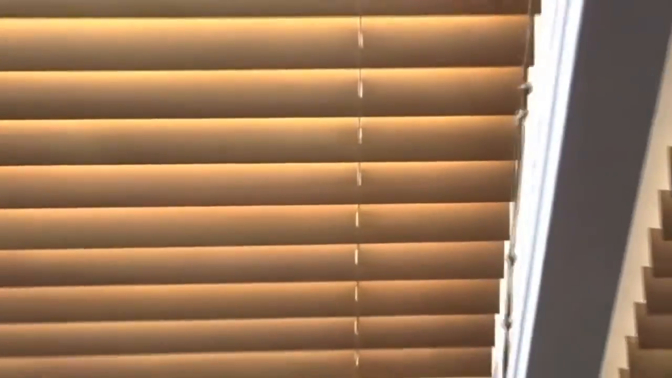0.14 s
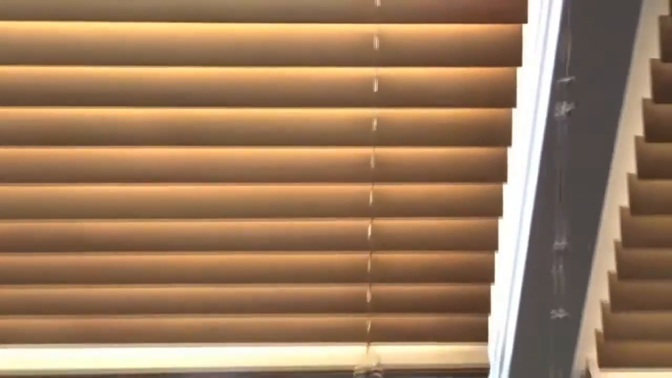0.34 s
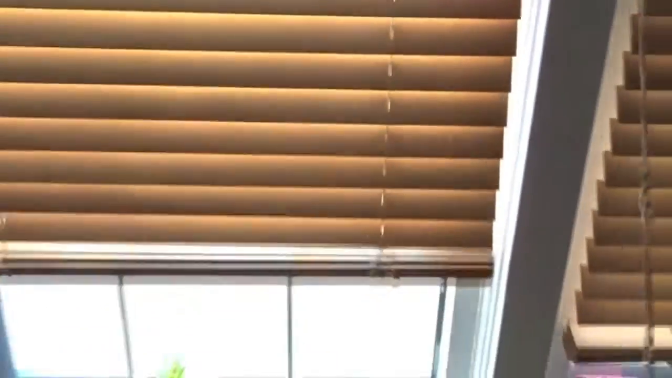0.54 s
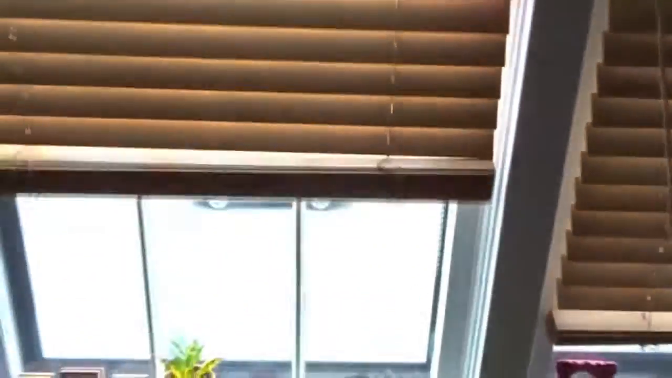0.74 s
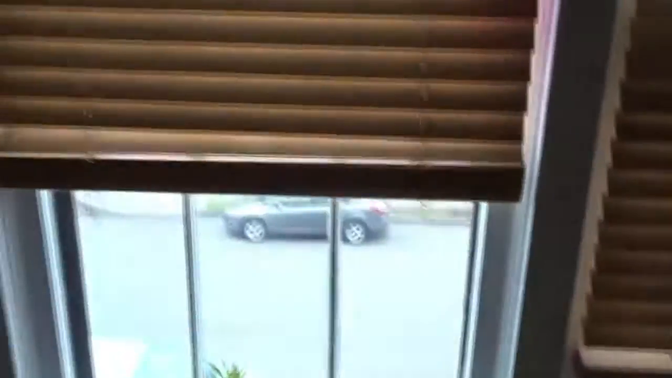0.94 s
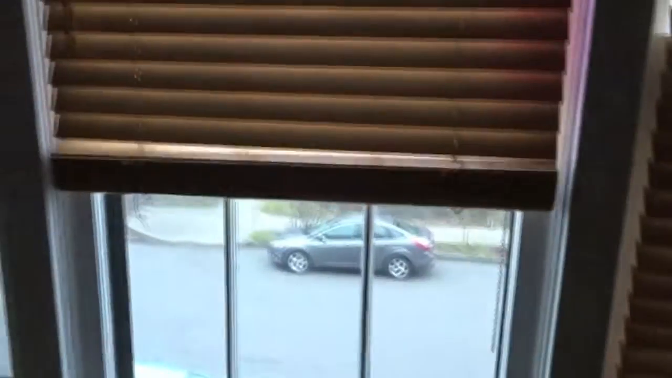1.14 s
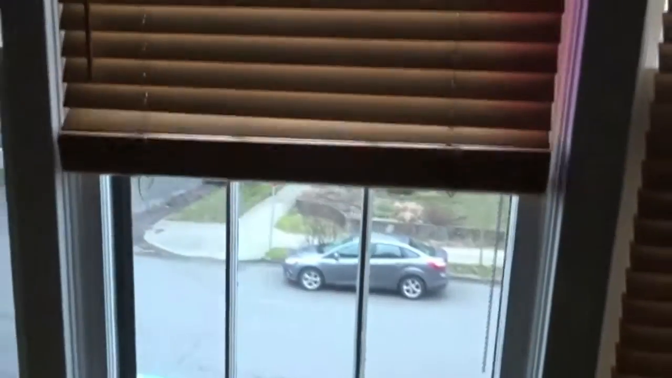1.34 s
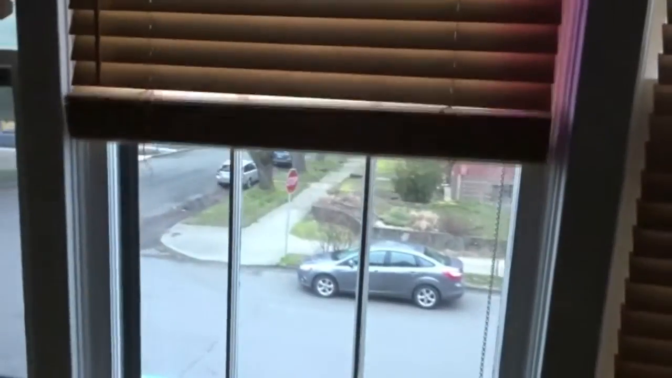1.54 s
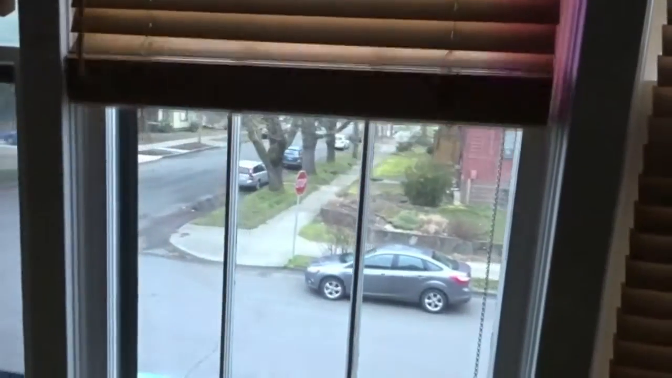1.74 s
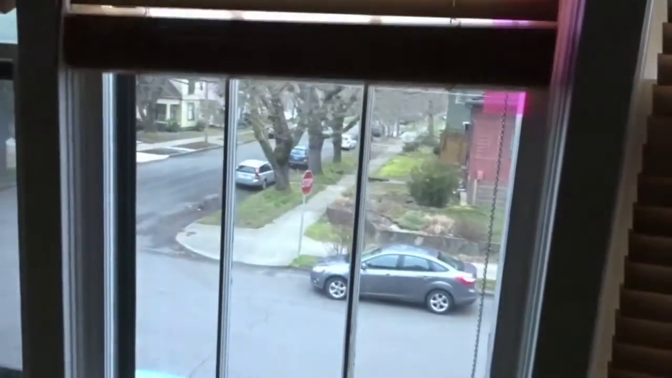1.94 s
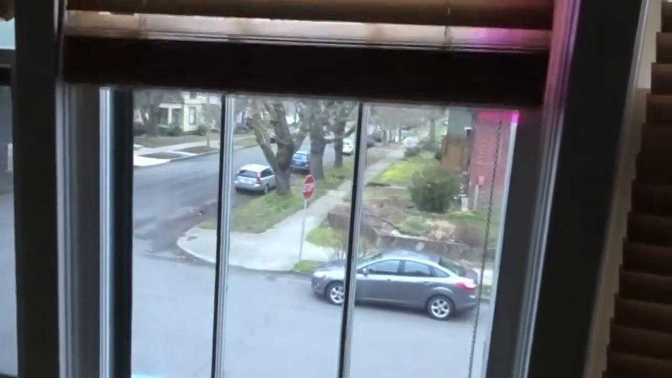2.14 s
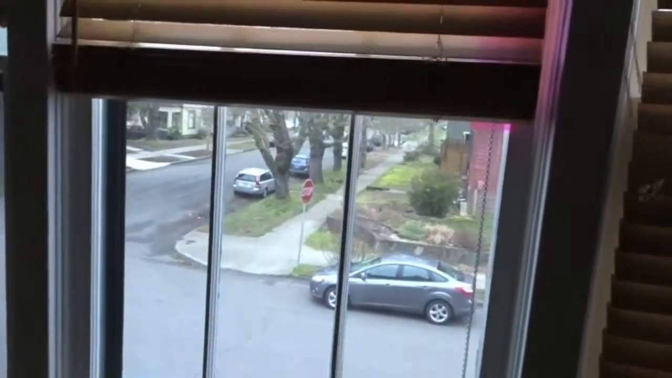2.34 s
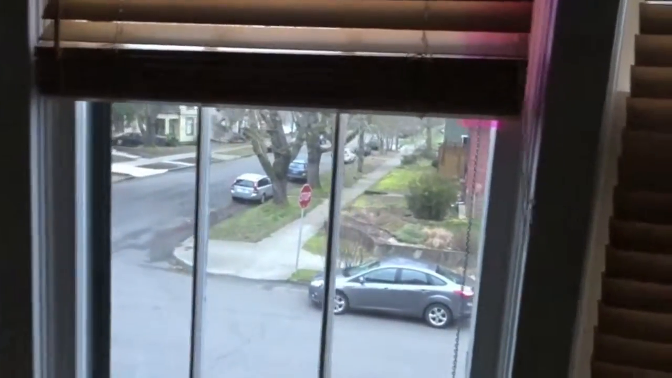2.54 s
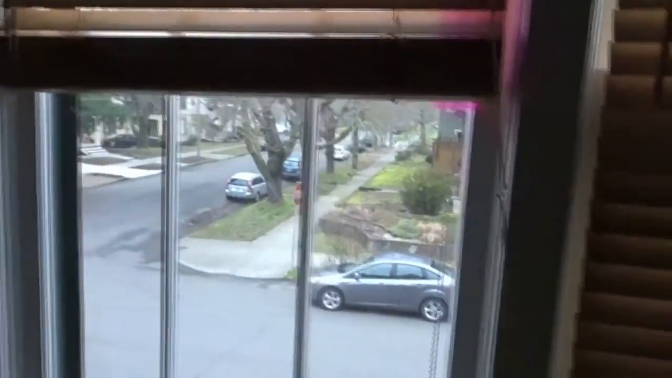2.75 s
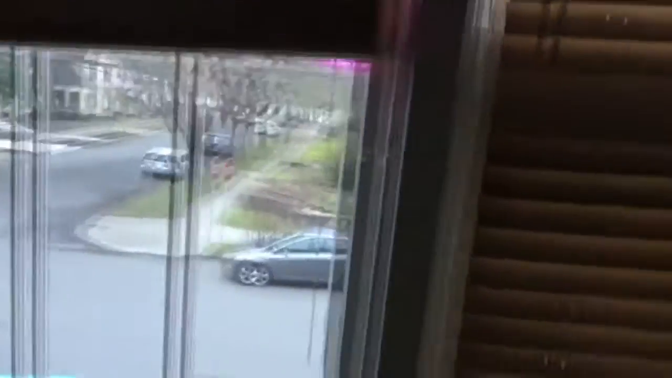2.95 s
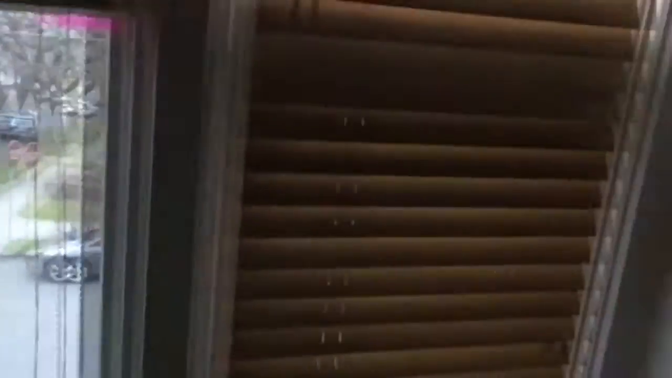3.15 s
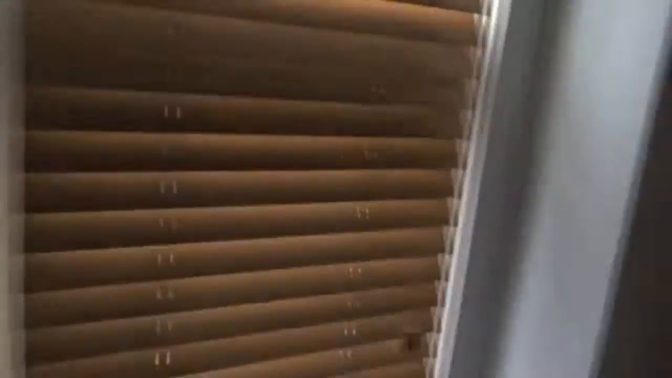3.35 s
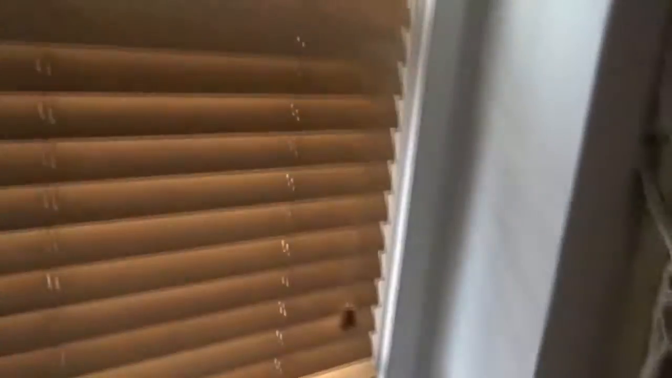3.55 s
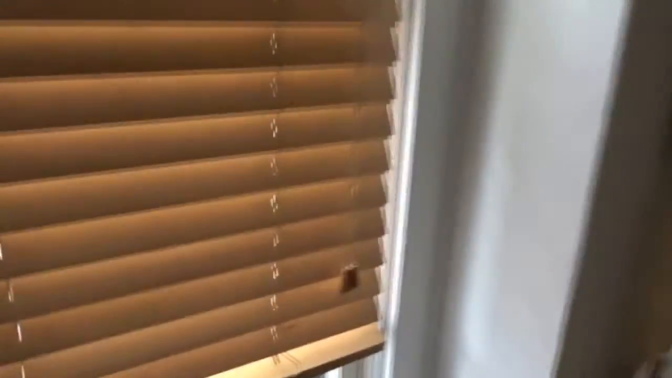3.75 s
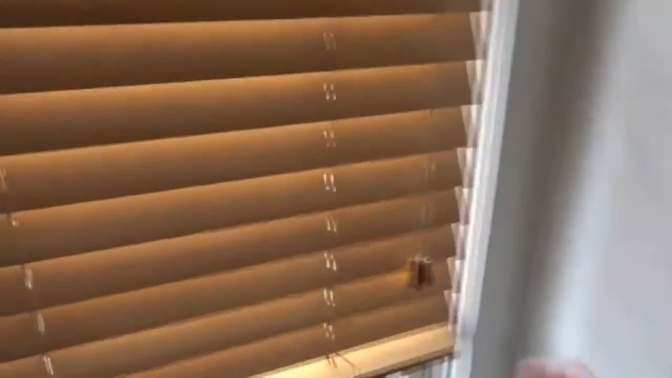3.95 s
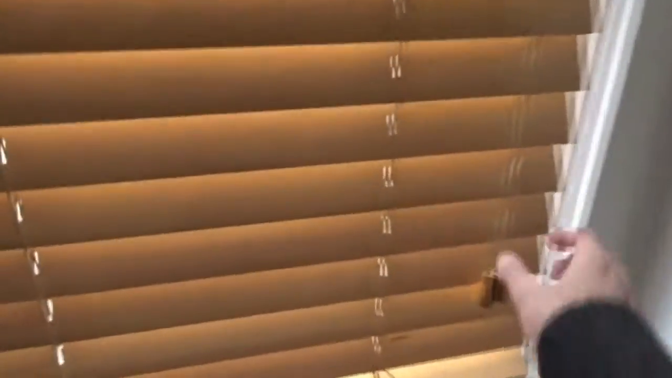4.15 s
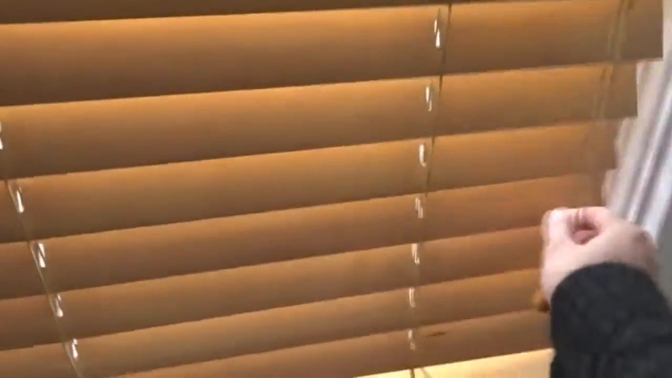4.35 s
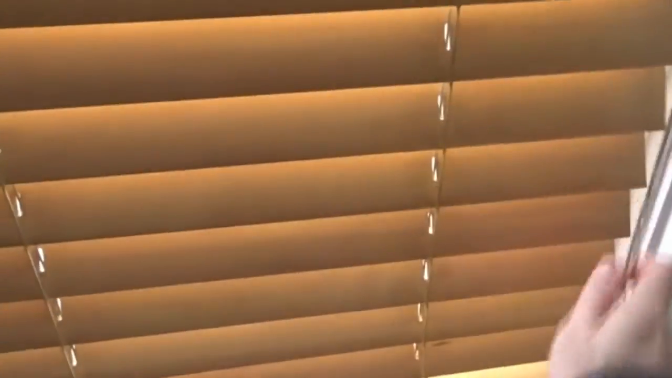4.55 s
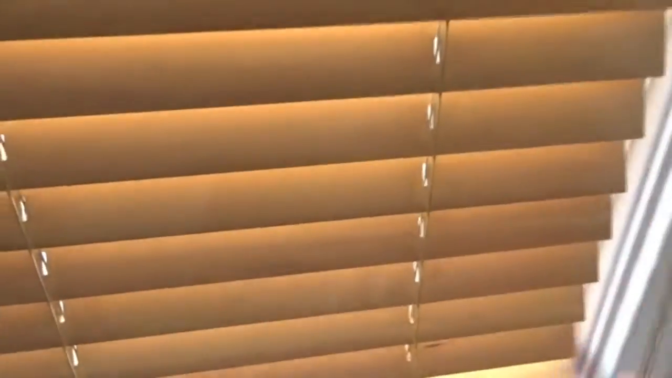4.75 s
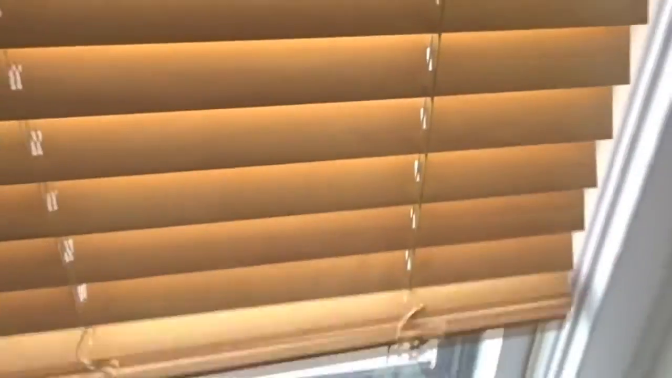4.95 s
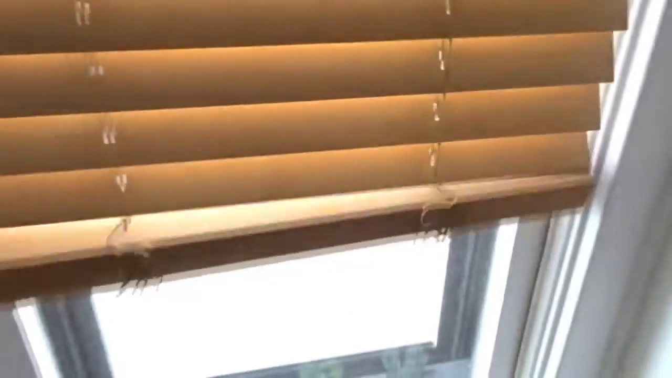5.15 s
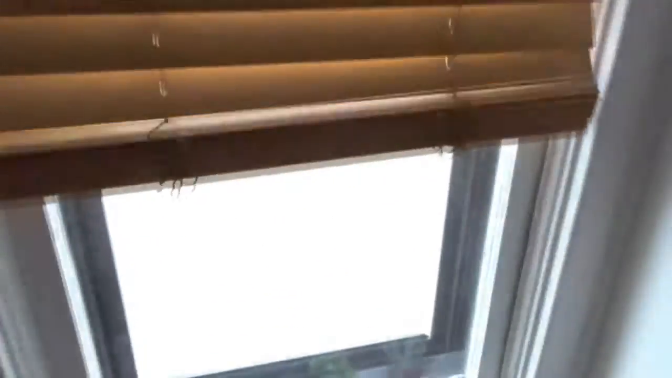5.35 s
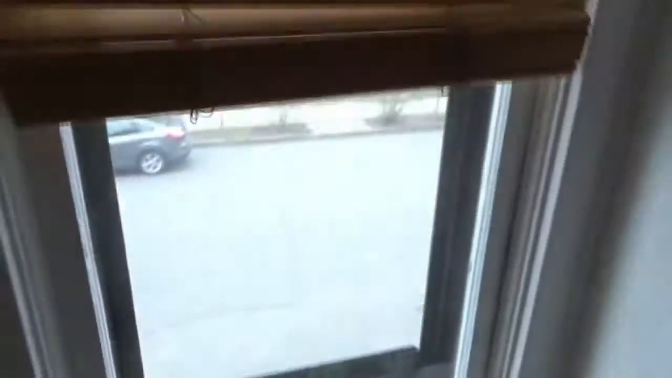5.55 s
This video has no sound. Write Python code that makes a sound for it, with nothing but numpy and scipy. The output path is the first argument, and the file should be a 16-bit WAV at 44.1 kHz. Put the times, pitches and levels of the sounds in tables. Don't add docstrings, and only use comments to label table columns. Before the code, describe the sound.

Wooden slat blinds are yanked up indoors in clattering bursts, with cord lock clicks, a brighter clack and a hollow knock between pulls.

```python
import sys
import numpy as np
from scipy import signal
from scipy.fft import rfft, irfft, next_fast_len
from scipy.io import wavfile
from scipy.ndimage import uniform_filter1d

SR = 44100
rng = np.random.default_rng(int(sys.argv[2]) if len(sys.argv) > 2 else 0)


def wrap_up_sound(samples):
    columns = np.atleast_2d(samples).T
    tamed = np.clip(columns, -1, 1)
    steps = np.round(tamed * 32767).astype(np.int16)
    wavfile.write(sys.argv[1], SR, steps)


def linear_from_db(decibels):
    return 10 ** (np.asarray(decibels, float) / 20)


N = 246959


def unit(x):
    return x / np.sqrt(np.mean(x ** 2) + 1e-20)


def along(points, hz):
    f, v = np.transpose(points)
    return np.interp(np.log(hz + 1), np.log(f + 1), v)


def filtered(x, response):
    m = next_fast_len(N + SR // 2)
    return irfft(rfft(x, m) * response(np.fft.rfftfreq(m, 1 / SR)), m)[..., :N]


def coloured(x, spectrum):
    cep = irfft(np.log(linear_from_db(along(spectrum, np.fft.rfftfreq(2048, 1 / SR))) + 1e-6))
    cep[1:1024] *= 2
    cep[1025:] = 0
    response = irfft(np.exp(rfft(cep)))
    return signal.fftconvolve(x, response[None] / np.linalg.norm(response), axes=1)[:, :N]


def resonances(modes):
    def response(f):
        total = 0
        for k, (centre, width, db) in enumerate(modes):
            drag = 1j * f * width
            total = total + (-1) ** k * linear_from_db(db) * drag / (centre * centre - f * f + drag)
        return total
    return response


def ring(x, hz, width_hz):
    r = np.exp(-np.pi * width_hz / SR)
    y = signal.lfilter([1, 0, -1], [1, -2 * r * np.cos(2 * np.pi * hz / SR), r * r], x)
    return y / np.abs(y).max()


def contacts(ms):
    t, span = np.arange(SR // 16) / SR, ms / 1000
    shape = (1 - np.exp(-t / (0.045 * span))) * np.exp(-(t / span) ** 1.6)
    bumps = np.repeat(rng.standard_normal(len(t) // 48 + 1), 48)[:len(t)]
    run = shape * linear_from_db(2.0 * bumps) * rng.standard_normal((2, len(t)))
    return run / np.sqrt(np.sum(run[0] ** 2) / (span * SR))


def chatter(rate, scatter_db):
    hit = rng.random(N) < rate / SR
    size = linear_from_db(scatter_db * np.minimum(rng.exponential(size=N), 4))
    return hit * size * rng.standard_normal((2, N))


def swells(rows):
    t, total = np.arange(N) / SR, 0
    for s, db, rise, fall in rows:
        away = np.where(t < s, (s - t) / abs(rise), (t - s) / abs(fall))
        total = total + linear_from_db(db - 20 * away)
    return total


# (time [s], level [dB])
PULLS = [
    [(.2, -67.5), (.43, -60), (.51, -51.5), (.65, -24), (.74, -32), (.8, -24.5), (.92, -32.5), (.98, -42),
     (1.02, -60)],
    [(.96, -60), (1.0, -43), (1.18, -37), (1.61, -36.5), (1.84, -30.5), (1.98, -44), (2.1, -54.5),
     (2.25, -51), (2.4, -69.5)],
    [(4.76, -71), (4.886, -41), (4.94, -41), (5.018, -30), (5.048, -28.5), (5.118, -33), (5.41, -31),
     (5.6, -36)],
]


def cord_speed():
    t = np.arange(N) / SR
    speeds = []
    for pull in PULLS:
        s, db = np.transpose(pull)
        speeds.append(np.interp(t, s, db, left=-120, right=-120))
    return np.max(speeds, axis=0) + 35


# (frequency [Hz], level [dB per Hz])
HUM = [(53, -53), (90, -17), (135, -10), (260, -6), (350, -2.5), (525, -12.5), (800, -18), (1980, -120)]
# (frequency [Hz], level [dB per Hz])
AIR = [(290, -29.5), (500, -9), (1020, -17), (1150, -15), (1980, -22.5), (14700, -38), (16500, -52.5)]
# (time [s], peak level [dB], time to rise 20 dB [s], time to fall 20 dB [s])
JOLTS = [
    (0, -67, .1, 0.5),
    (.55, -51, -0.1, .5),
    (1.8, -57, 0, .4),
    (3.17, -60.5, -0.1, 1),
    (4.55, -61, 0.3, 0.3),
    (5.26, -53, -0.1, 0.3),
    (5.6, -57, 0.1, -1),
]


def background():
    def noise(spectrum):
        return unit(filtered(rng.standard_normal((2, N)), lambda hz: linear_from_db(along(spectrum, hz))))
    rumble = noise([(15, -28), (30, -1.5), (60, -6.5), (90, -18), (200, -59)])
    house_db, frame_db, frame_grows = -54.5, -48.5, .5
    boom = np.hypot(linear_from_db(house_db), linear_from_db(frame_db + frame_grows * cord_speed()))
    still_hand_db = -71
    hand = linear_from_db(still_hand_db) + swells(JOLTS)
    return hand * rumble + boom * noise(HUM) + linear_from_db(-59.5) * noise(AIR)


# (frequency [Hz], level [dB per Hz])
CLOTH = [(500, -23), (1200, 3.5), (2500, -2), (4500, -2.5), (7500, -5), (11000, -13), (16000, -19.5)]
# (time [s], peak level [dB], time to rise 20 dB [s], to fall 20 dB [s])
SLEEVE = [
    (.25, -66.5, 3, .4),
    (.465, -36.5, 0.08, 0.8),
    (2.2, -42.5, .05, .09),
    (2.64, -68.5, 0.4, 0.3),
    (3.55, -64.5, .9, .3),
    (3.89, -63.5, 0.17, .11),
    (4.31, -49.5, 0.01, -0.05),
    (4.375, -45.5, 0.03, 0.15),
    (4.53, -46.5, 0.13, .2),
    (4.66, -60, 0, .1),
]


def sleeve():
    rustle = unit(coloured(chatter(13000, scatter_db=3), CLOTH))
    return swells(SLEEVE) * rustle


# (frequency [Hz], width [Hz], level [dB])
STACK = [(599, 81, 0), (810, 180, -1), (1000, 280, -6.5)]
# (frequency [Hz], width [Hz], level [dB])
SLATS = [(1600, 370, -6.5), (2500, 250, 0), (2950, 160, -3), (3550, 290, -3.5), (5170, 400, -6),
         (5950, 140, -6), (6860, 410, -11)]
# (frequency [Hz], level [dB per Hz])
HISS = [(3000, -17.5), (6000, 2), (10000, 4.5), (16000, -28.5)]
# (level at a steady pull [dB], growth with speed [dB per dB])
FOLLOWS = [
    (-36.5, .58),
    (-34, 0.99),
    (-42.5, 1.2),
]


def rattle():
    stack = resonances(STACK)

    def stack_body(f):
        thin_bass = f ** 2 / (f ** 2 + 550 ** 2) * f ** 2 / (f ** 2 + 450 ** 2)
        return stack(f) * thin_bass

    layers = [filtered(chatter(1500, scatter_db=2.0), stack_body),
              filtered(chatter(2500, scatter_db=3.0), resonances(SLATS)),
              coloured(chatter(4000, scatter_db=2.5), HISS)]
    speed, total = cord_speed(), 0
    for (db, grows), layer in zip(FOLLOWS, layers):
        total = total + linear_from_db(db + grows * speed) * unit(layer)
    return total


# (pull start [s], note [Hz], fall [Hz per s], negative = rising)
STACK_NOTE = [
    (.4, 850, 170),
    (1, 770, -90),
    (4.8, 930, 290),
]


def stack_note(s):
    begun = [row for row in STACK_NOTE if row[0] <= s] or STACK_NOTE[:1]
    start, hz, fall = begun[-1]
    scatter = .055
    return (hz - fall * (s - start)) * (1 + scatter * rng.standard_normal())


# (frequency [Hz], level [dB per Hz])
CRACK = [(590, -25), (1000, -0.5), (1700, -3), (3050, -5), (4130, -5), (11500, -9.5), (15600, -13.5),
         (16500, -52.5)]


def wooden(x):
    slats = resonances(SLATS)
    return filtered(coloured(x, CRACK), lambda f: 1 + .6 * slats(f))


# (time [s], peak level [dB], stack note re peak [dB], slat note [Hz])
FIRST_PULL = [(.3416, -38.5, -6, 2280), (.4688, -16, -9.5, 3100), (.5018, -8.5, -11.5, 2940),
              (.5394, -16, -5.5, 5040), (.5806, -8, -13, 2500), (.6304, -10.5, -7.5, 3230),
              (.6444, -7.5, -11, 3240), (.6794, -6.5, -16.5, 3000), (.6954, -11.5, -4, 2830),
              (.7104, -12, -4, 2880), (.7392, -5.5, -15.5, 5970), (.7602, -7, -13.5, 2960),
              (.7786, -6, -20, 2400), (.7994, -12, -17, 2480), (.8204, -9.5, -5, 2600),
              (.8634, -7, -7.5, 3030), (.8994, -18.5, -8.5, 3030), (.9916, -12, -7, 3900),
              (1.0074, -21, -27, 3120)]
SECOND_PULL = [(1.0959, -24, -26, 3250), (1.1483, -13, -11.5, 2950), (1.2042, -19, -10.5, 2760),
               (1.2545, -19, -4.5, 3210), (1.2773, -18, -14.5, 2920), (1.3418, -16, -21.5, 5000),
               (1.3834, -17, -7.5, 3750), (1.4048, -14, -15, 2860), (1.4682, -14.5, -13, 2560),
               (1.4804, -23.5, -4.5, 2850), (1.511, -15.5, -4, 2800), (1.5644, -30, -1.5, 2380),
               (1.5907, -18.5, -20.5, 2840), (1.6325, -17.5, -20.5, 2874), (1.6546, -14, -16, 5000),
               (1.6664, -13, -10, 2940), (1.7093, -14.5, -13.5, 2910), (1.732, -14.5, -4.5, 2640),
               (1.7644, -7.5, -10, 3460), (1.8694, -16.5, -11, 3370), (1.9056, -16.5, -12.5, 2860),
               (1.9295, -18, -9.5, 5040), (2.1044, -33.5, -1.5, 3030), (2.1844, -33.5, -5.5, 3990)]
THIRD_PULL = [(4.8115, -45, 0, 5050), (4.8315, -36, -2, 3190), (4.8658, -20.5, -21, 4090),
              (4.8858, -17, -12, 6150), (4.9207, -17, -10, 2930), (4.97, -18, -10, 2910),
              (4.9991, -9.5, -24, 2950), (5.0387, -13, -21, 4340), (5.1089, -13, -15.5, 3410),
              (5.1472, -7.5, -24, 3430), (5.186, -11, -19, 3380), (5.231, -13.5, -6.5, 3550),
              (5.2874, -13.5, -11, 2480), (5.3156, -9, -12.5, 3200), (5.4146, -7, -13.5, 2196),
              (5.45, -9.5, -15.5, 3203), (5.4891, -7, -10, 3480), (5.5213, -9, -17, 5300),
              (5.5661, -8, -13, 3550)]
# (time [s], peak level [dB], stack note re peak [dB], slat note [Hz])
BLOWS = [(.5018, -10, -1.5, 2870), (1.1483, -19, -6, 2950), (1.7644, -5.5, -26, 3540),
         (4.9207, -22, -2, 2960), (5.0444, -10, -20, 4580), (5.1088, -9.5, -4, 3410),
         (5.3158, -12, -8, 3350), (5.3344, -17, -7.5, 2970), (5.4141, -14, .5, 2200),
         (5.4374, -7.5, -12, 3100), (5.5814, -6, -22, 5350)]


def claps(rows, hard_ms, softer):
    cracks, notes, pushes = np.zeros((3, 2, N + SR))
    for s, db, rel_db, high_hz in rows:
        run = contacts(1.335 * (hard_ms - softer * db))
        low_hz = stack_note(s)
        start = round(s * SR)
        at = slice(start, start + run.shape[1])
        cracks[:, at] += linear_from_db(db - 12.5) * run
        pushes[:, start] += linear_from_db(db - 11) * np.linalg.norm(run[0])
        notes[:, at] += linear_from_db(db - 7) * ring(run, high_hz, high_hz / 12)
        low = ring(ring(run, low_hz, width_hz=162), low_hz, width_hz=1000)
        notes[:, at] += linear_from_db(db + rel_db + 4) * low
    return np.array([wooden(cracks[:, :N]), notes[:, :N], wooden(pushes[:, :N])])


# (time [s], peak level [dB], note [Hz])
THUDS = [(0.402, -35, 855), (0.416, -31, 930), (0.437, -27, 953), (0.866, -16, 760), (1.385, -19, 885),
         (1.515, -15, 720), (2.23, -30, 751), (2.454, -29, 2060), (3.257, -35, 970), (3.262, -39, 1600),
         (3.275, -39.5, 980), (4.264, -43, 940), (4.666, -33, 850), (4.69, -38, 830), (5.06, -25, 570),
         (1.258, -24, 670)]
# (time [s], peak level [dB], note [Hz])
THUMPS = [
    (1.64, -34, 150),
    (1.91, -42, 129.6),
    (3.49, -40, 348),
    (4.42, -43, 187),
    (4.515, -32, 165),
    (4.286, -45, 170),
    (4.99, -38, 184),
    (5.04, -40, 180),
]


def thuds(rows, ms, width_hz):
    out = np.zeros((2, N + SR))
    for s, db, hz in rows:
        run = np.pad(contacts(ms), ((0, 0), (0, SR // 4)))
        bump = ring(ring(run, hz, width_hz), hz, hz)
        out[:, round(s * SR):][:, :bump.shape[1]] += linear_from_db(db) * bump
    return out[:, :N]


# (time [s], peak level [dB], body re peak [dB], click centre [Hz], room level [dB])
TAPS = [
    (2.4349, -28.5, -8, 3870, -10),
    (2.6173, -34, -21.5, 3550, -4),
    (3.5849, -51, 10.5, 3650, 2),
    (3.896, -46.5, -8, 3310, -7),
    (4.288, -28, -8, 3000, -9),
    (4.3051, -31.5, -18, 4140, -8.5),
    (4.4194, -34, -23, 4390, -14),
    (4.5244, -30, 10, 4100, -11.5),
    (4.5537, -32.5, 6, 3870, -11),
    (4.6296, -18, -30, 4600, -8),
]


def taps():
    dry, wet = np.zeros((2, 2, N + SR))
    for s, db, low_db, hz, room_db in TAPS:
        run = contacts(ms=4)
        run[:, 0] += 5
        body = ring(run, 520, width_hz=800)
        click = linear_from_db(db) * (ring(run, hz, 0.87 * hz) + linear_from_db(low_db) * body)
        at = slice(round(s * SR), round(s * SR) + run.shape[1])
        dry[:, at] += click
        wet[:, at] += linear_from_db(room_db) * click
    return dry[:, :N], wet[:, :N]


# (time [s], peak level [dB], room level [dB])
FAR = [
    (2.436, -35, 2.5),
    (3.032, -23, 4),
]
# (frequency [Hz], level [dB per Hz])
LATCH = [
    [(88, -28), (200, -13), (535, -12), (900, 1.5), (1900, -9), (2600, -17), (4200, -20), (11500, -39),
     (15000, -51.5)],
    [(88, -37), (150, -13.5), (500, -8), (1330, -9.5), (3370, -6.5), (9580, -17), (12000, -19),
     (14000, -44.5)],
]
# (delay [s], level [dB])
ECHOES = [
    (0, 2.5),
    (.004, 6),
    (.008, 2.5),
    (.016, -8),
    (.022, -12),
]


def far_clack(s, db, room_db, colour):
    out, push = np.zeros((2, 2, N))
    t = np.arange(SR // 20) / SR
    for delay, echo_db in ECHOES:
        burst = linear_from_db(db + echo_db - 60 * t / 0.016) * rng.standard_normal((2, len(t)))
        out[:, round((s + delay) * SR):][:, :len(t)] += burst
    push[:, round(s * SR)] = linear_from_db(room_db) * np.linalg.norm(out[0])
    return coloured(out, colour), coloured(push, colour)


# (frequency [Hz], level [dB], time to die by 60 dB [s])
TASSEL = [(957, 0, .3), (1510, 4.5, 0.24), (2060, 1.5, 0.23), (2380, -7, .12), (3550, -19, .25),
          (3950, -11, .3), (4390, -14, .3)]


def tassel(s=2.4365, db=-41):
    out, t = np.zeros((2, N)), np.arange(SR // 3) / SR
    rough = uniform_filter1d(rng.standard_normal((len(TASSEL), len(t))), 400, axis=1).cumsum(axis=1) * .004
    modes = 0
    for (hz, level, t60), drift in zip(TASSEL, rough):
        modes = modes + linear_from_db(level - 60 * t / t60) * np.sin(2 * np.pi * hz * t + drift)
    out[0, round(s * SR):][:len(t)] = linear_from_db(db) * modes
    return out


# (frequency [Hz], level [dB], time to die by 60 dB [s])
SILL = [(174, -6.5, 0.31), (256, 2, 0.1), (365, 3.5, 0.13), (819, 2, 0.049), (1650, -6.5, 0.11),
        (1840, -35, 0.46), (2200, -42, 0.61), (2379, -27, 0.11), (2740, -25, 0.19)]


def sill_knock(s=4.5095, db=-23):
    out, t = np.zeros((2, N)), np.arange(SR // 2) / SR
    rough = uniform_filter1d(rng.standard_normal((len(SILL), len(t))), 300, axis=1).cumsum(axis=1) * .003
    modes = 0
    for k, (hz, level, t60) in enumerate(SILL):
        modes = modes + (-1) ** k * linear_from_db(level - 60 * t / t60) * np.sin(2 * np.pi * hz * t + rough[k])
    push = -3.3 * linear_from_db(-60 * t / 0.014) * np.sin(2 * np.pi * 450 * t)
    shudder = ring(rng.standard_normal(len(t)), 750, width_hz=960)
    push += 2.8 * linear_from_db(-60 * t / 0.076) * shudder
    boom = ring(ring(rng.standard_normal(len(t)), 230, width_hz=260), 250, width_hz=300)
    push += .8 * linear_from_db(-60 * t / 0.33) * boom
    onset = 1 - np.exp(-t / 0.00095)
    out[0, round(s * SR):][:len(t)] = linear_from_db(db) * (modes * onset + push)
    return out


# (frequency [Hz], time to die by 60 dB [s])
ROOM = [(200, 0.49), (600, 0.47), (1400, 0.62), (3700, 0.56), (9700, 0.36), (14000, .24)]


def room(x):
    out, step = np.zeros((2, N + 2 * SR)), SR // 3
    for a in range(0, N, step):
        hz, t, z = signal.stft(rng.standard_normal((2, SR * 3 // 4)), SR, nperseg=256)
        fade = linear_from_db(-60 * t / along(ROOM, hz)[:, None])
        tail = signal.istft(z * fade, SR, nperseg=256)[1]
        wet = signal.fftconvolve(x[:1, a:a + step], tail / np.linalg.norm(tail[0]), axes=1)
        out[:, a + 300:][:, :wet.shape[1]] += wet
    return out[:, :N]


def ports(pair, alike):
    def response(hz):
        turn = np.arccos(np.clip(along(alike, hz), -1, 1)) / 2
        return np.array([np.cos(turn), np.sin(turn)])
    mid, side = filtered(pair, response)
    return np.array([mid + side, mid - side])


# (frequency [Hz], likeness [1 = same, 0 = unrelated])
NEAR = [(100, .998), (640, 1), (1400, 1), (2400, 0.94), (4400, 0.48), (8000, -0.033), (15000, -0.6)]
DIFFUSE = [(100, .998), (500, 1), (1300, 0.98), (2400, 0.78), (4400, 0.48), (8000, -.05)]
QUIET = [(60, .999), (300, .999), (700, 0.81), (1300, 0), (4400, 0.014)]


def scene():
    slat_claps = claps(FIRST_PULL + SECOND_PULL + THIRD_PULL, hard_ms=5, softer=.22)
    cracks, notes, pushes = slat_claps + claps(BLOWS, hard_ms=1.8, softer=0)
    bumps = thuds(THUDS, ms=14.6, width_hz=200) + thuds(THUMPS, ms=30, width_hz=30)
    clicks, clicks_wet = taps()
    clacks, clacks_wet = np.sum([far_clack(*row, colour) for row, colour in zip(FAR, LATCH)], axis=0)
    loose = rattle()
    knock = tassel() + sill_knock()
    dry = cracks + notes + clicks + linear_from_db(-2) * loose + knock + bumps + clacks + sleeve()
    wet = linear_from_db(-3) * pushes + linear_from_db(-6) * notes + clicks_wet + clacks_wet
    wet += linear_from_db(-11.5) * loose + linear_from_db(-7.0) * knock + linear_from_db(-7.5) * bumps
    heard = ports(dry, NEAR) + ports(room(wet), DIFFUSE) + ports(background(), QUIET)
    lean = [(1500, 0.063), (6000, .6), (12000, 0.077)]  # (Hz, dB up on the left and down on the right)
    return filtered(heard, lambda hz: linear_from_db([[1], [-1]] * along(lean, hz)))


def top_cut(x):
    return signal.sosfilt(signal.butter(12, 16600, fs=SR, output="sos"), x)


def record(dry):
    top = .75
    mix = dry / (1 + np.abs(dry / top) ** 4) ** (1 / 4)
    return top_cut(mix)


dry = scene()
out = record(dry)
wrap_up_sound(out)
```